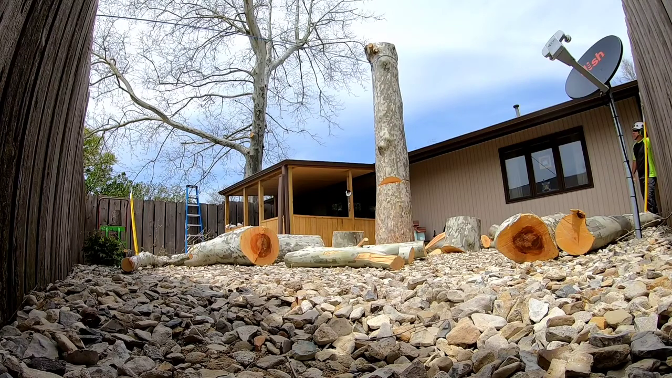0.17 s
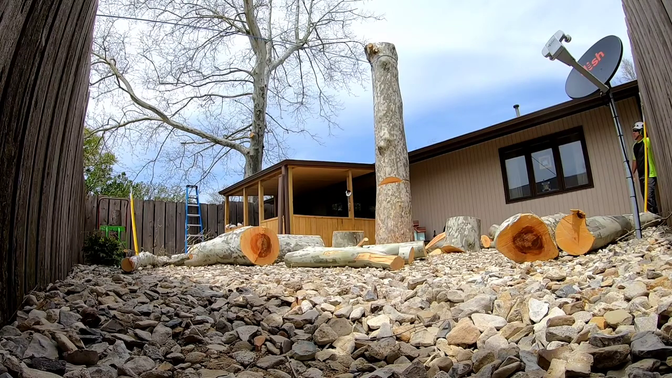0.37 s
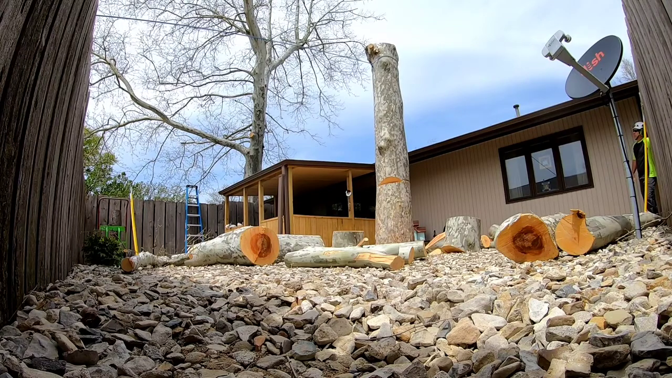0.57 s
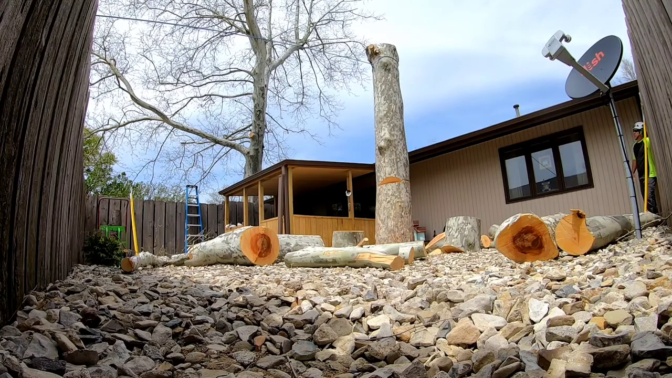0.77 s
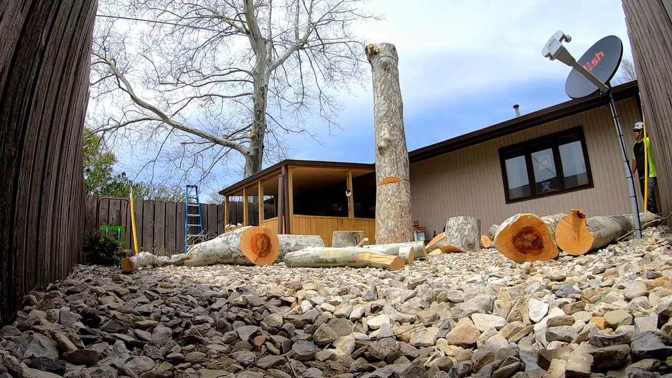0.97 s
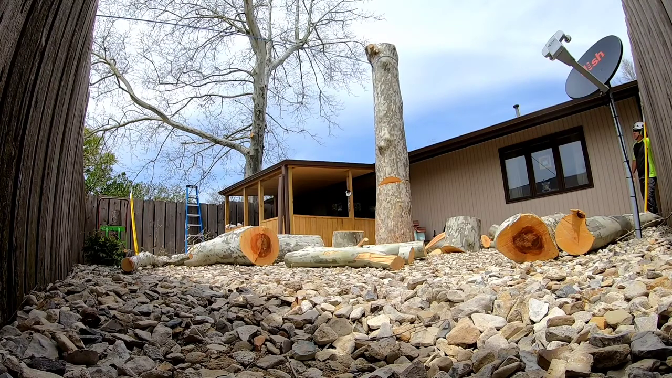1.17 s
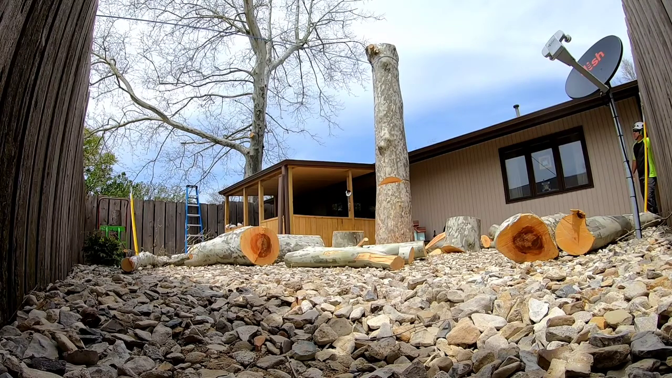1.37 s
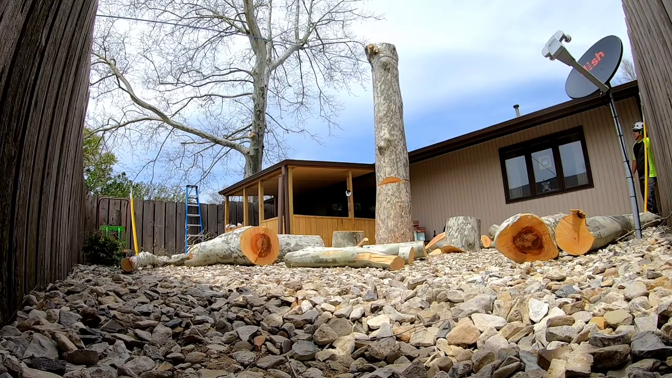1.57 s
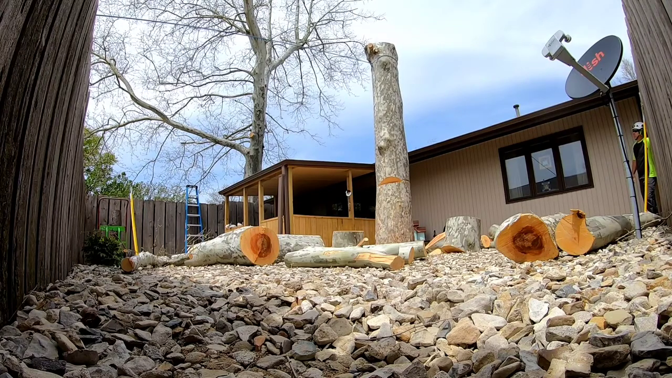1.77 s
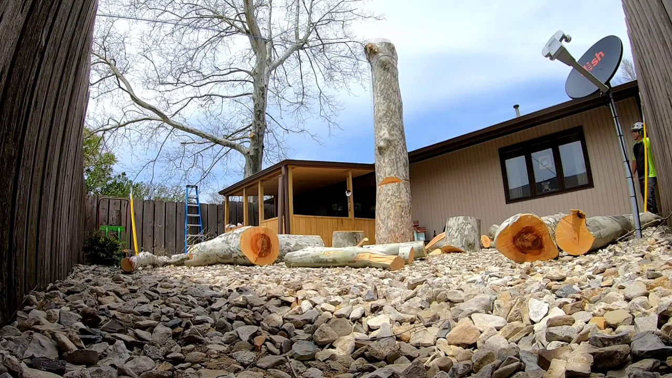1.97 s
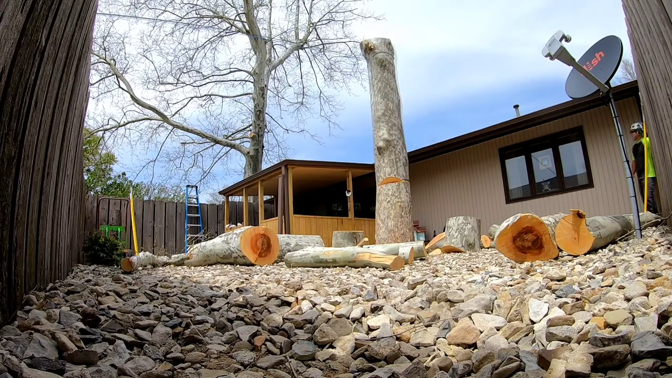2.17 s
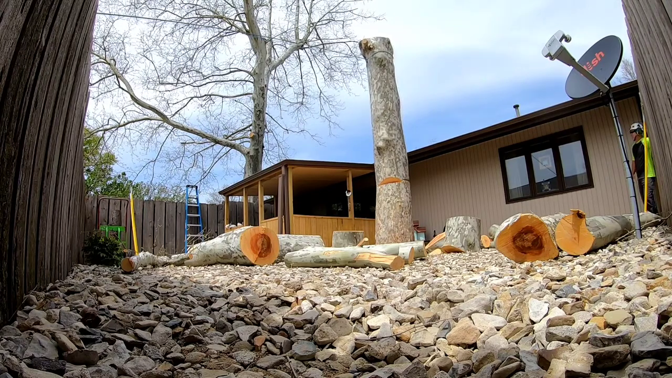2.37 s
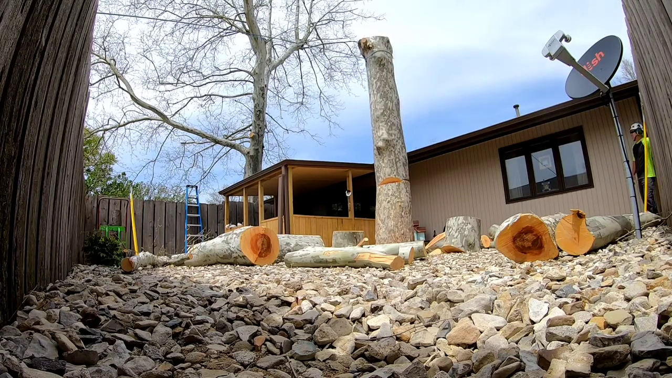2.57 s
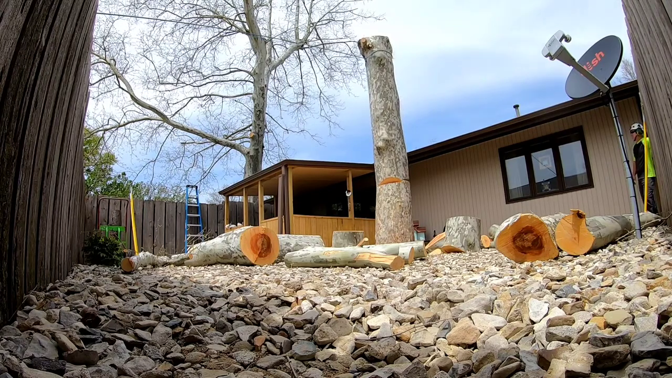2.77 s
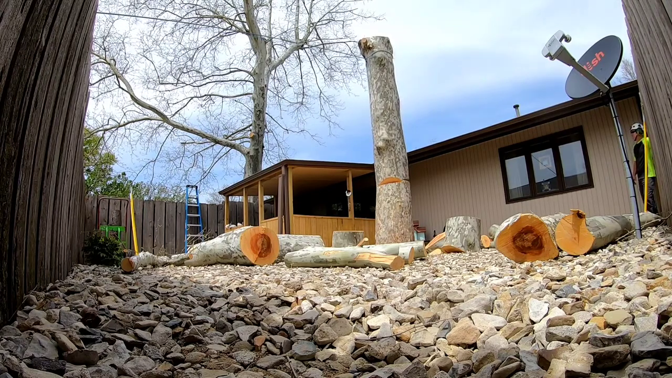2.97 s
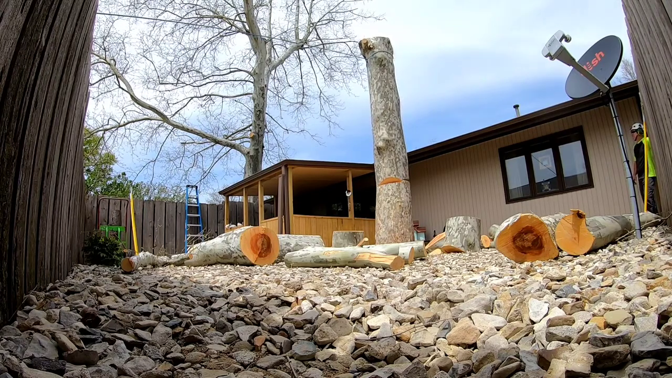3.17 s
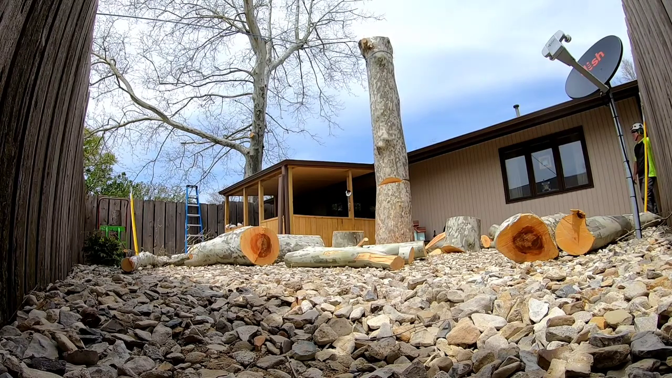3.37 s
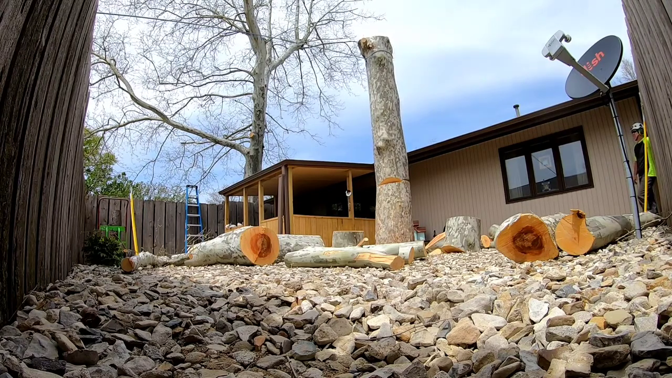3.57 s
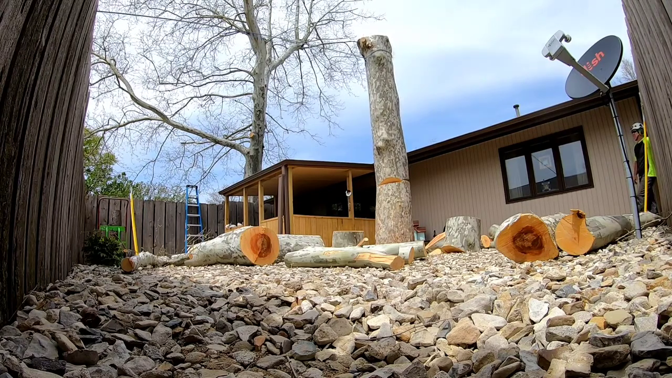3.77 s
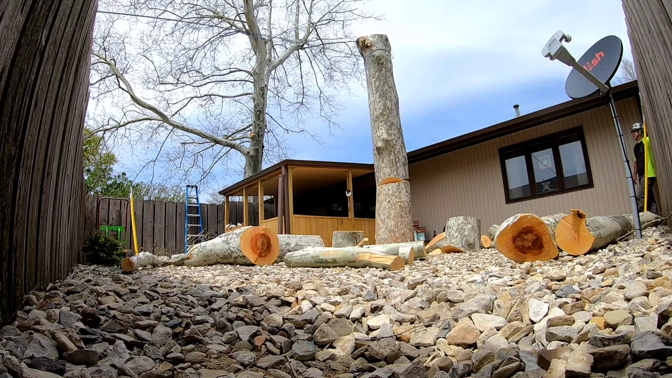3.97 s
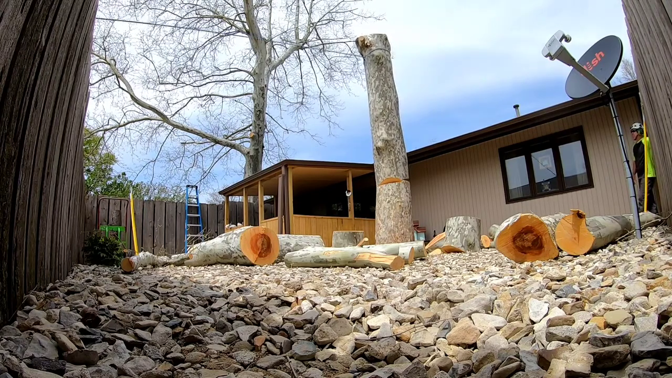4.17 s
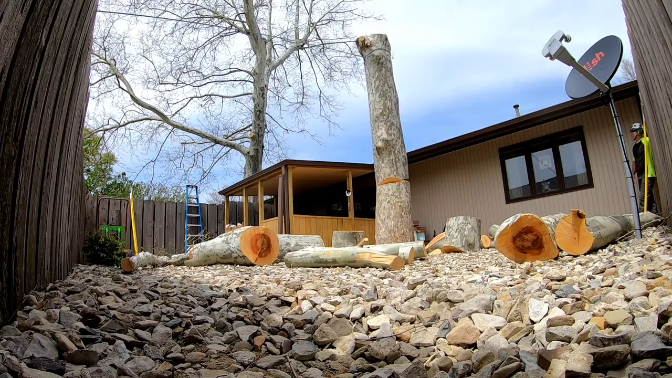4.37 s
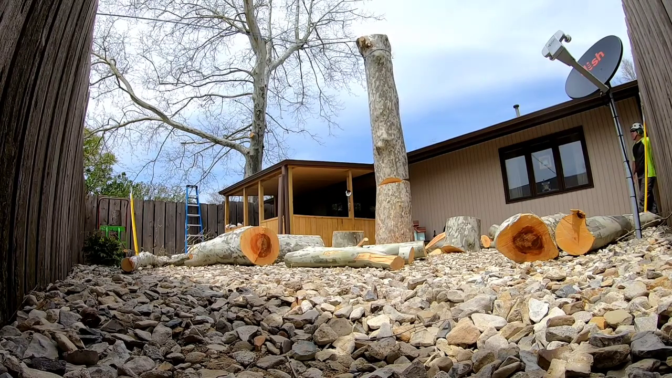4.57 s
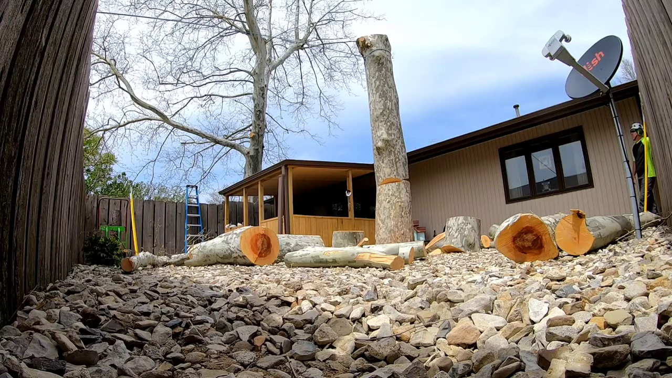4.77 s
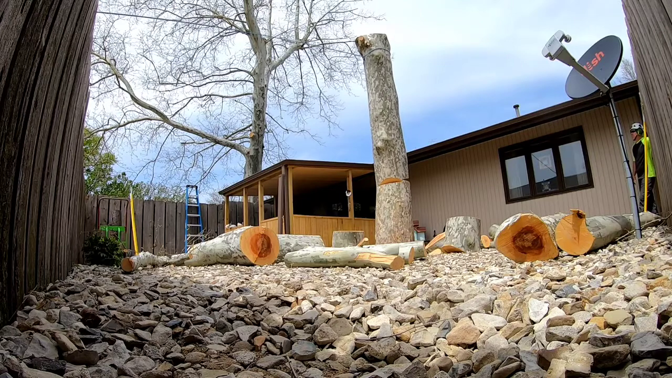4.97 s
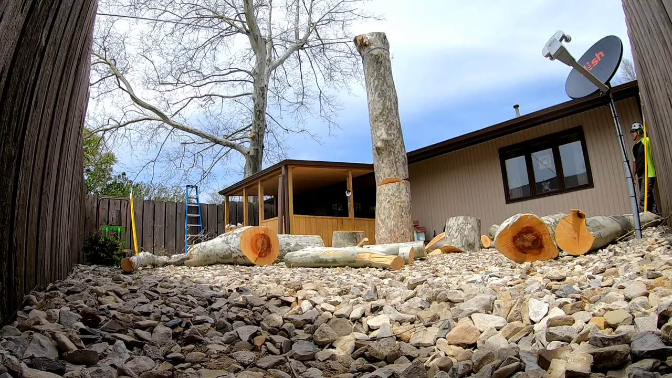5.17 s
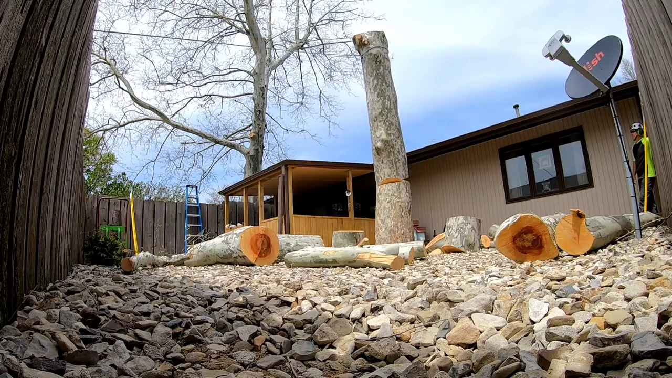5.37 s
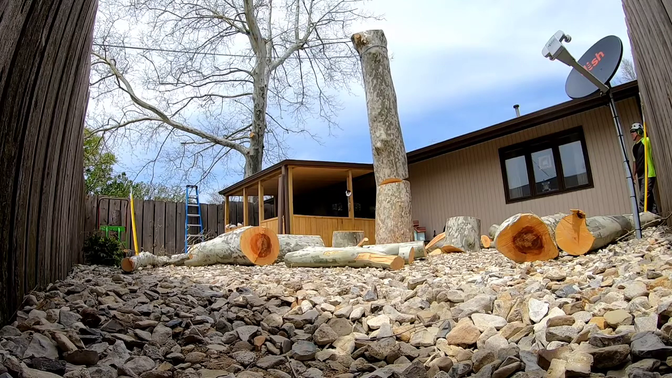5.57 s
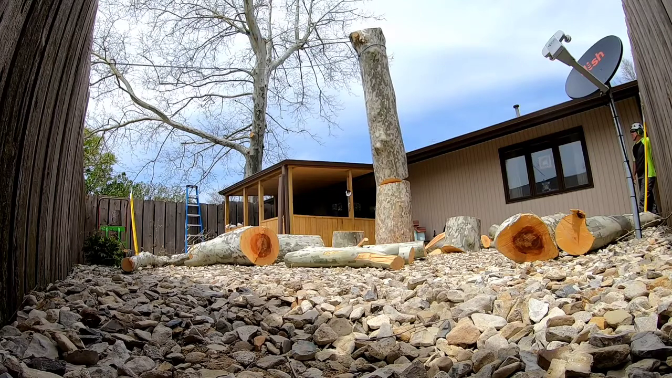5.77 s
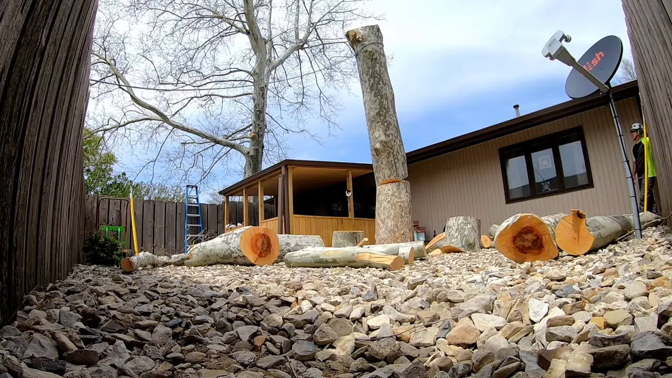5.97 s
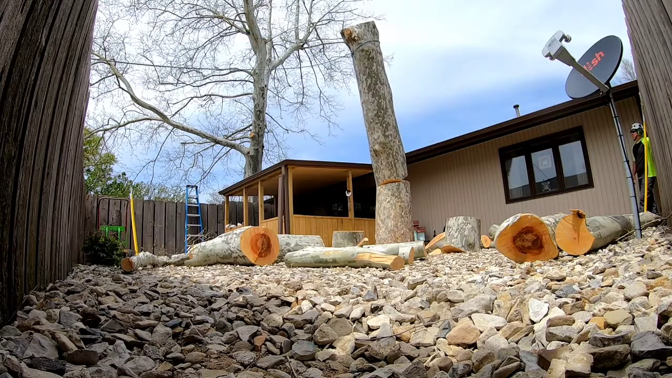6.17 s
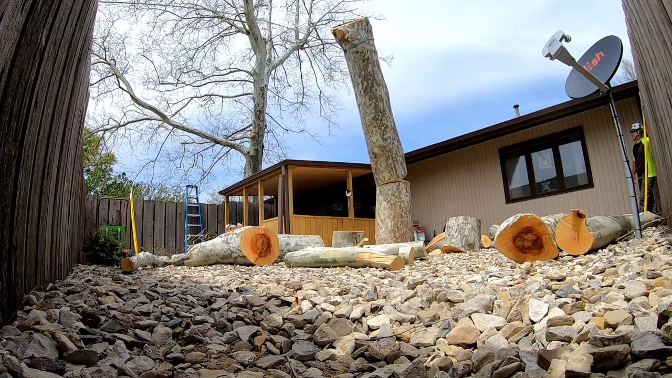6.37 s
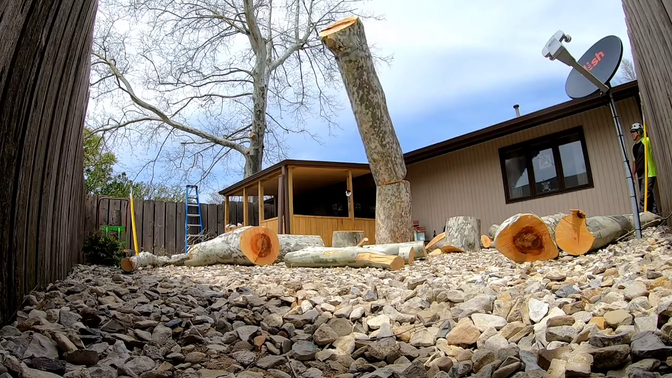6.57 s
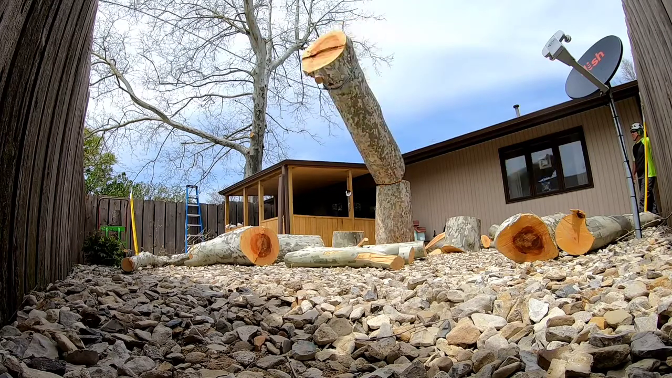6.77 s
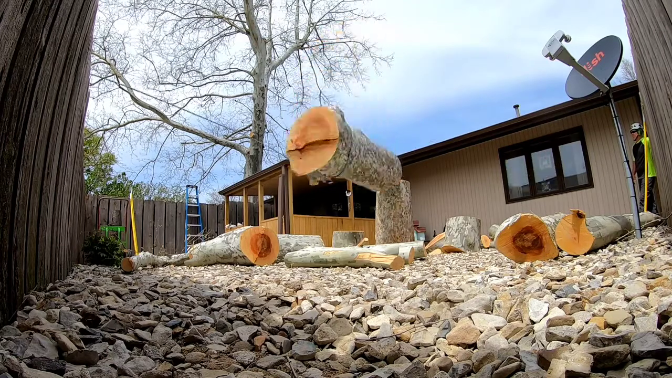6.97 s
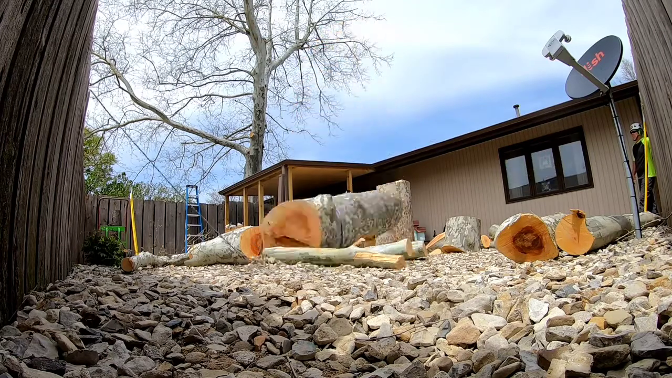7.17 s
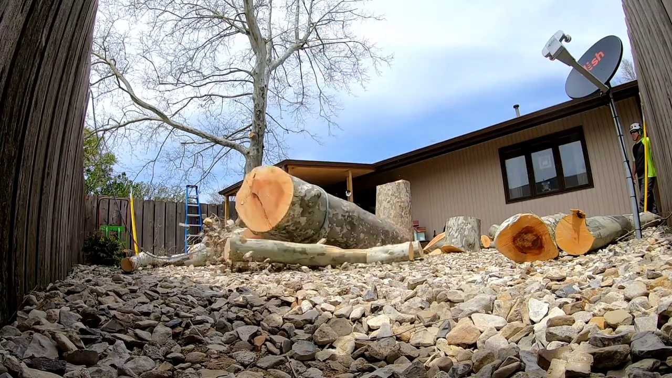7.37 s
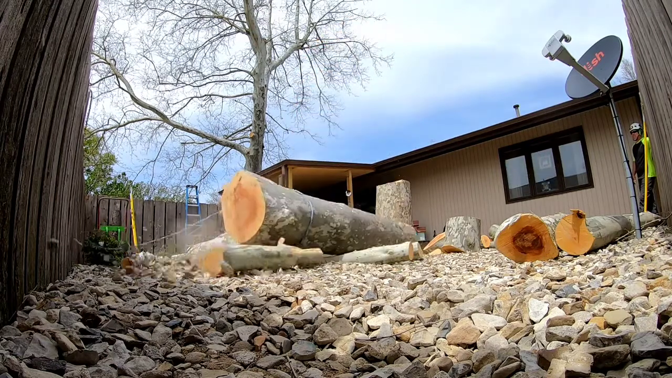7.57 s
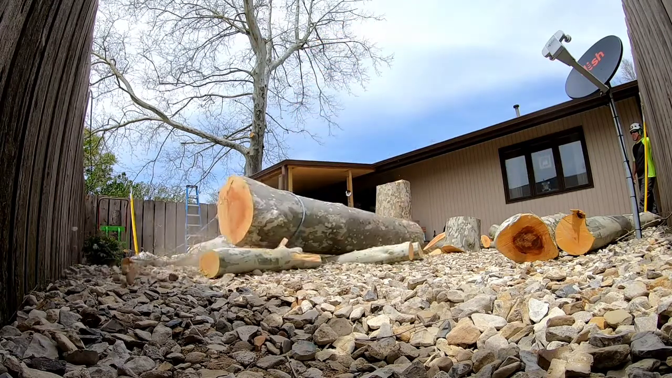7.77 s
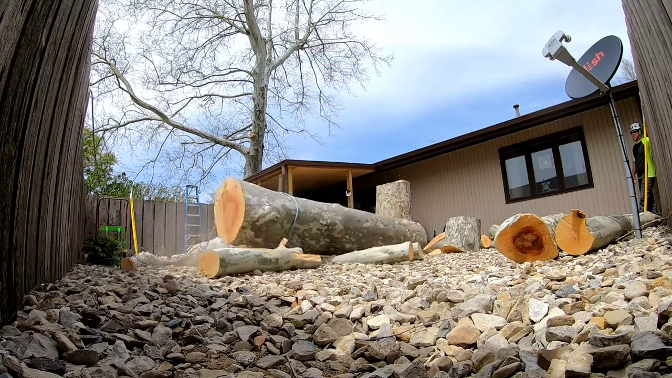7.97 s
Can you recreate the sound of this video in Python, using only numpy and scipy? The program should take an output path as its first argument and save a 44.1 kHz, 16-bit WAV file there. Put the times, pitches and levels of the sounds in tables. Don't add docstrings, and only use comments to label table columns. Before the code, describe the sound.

Stereo microphone at ground level in a small gravel yard. From 0 to about 2 s a car's low hum and faint fluttering tyre whine recede over soft town rumble; a distant bird rasps several times from 1.2 to 1.8 s. At 2.4-3.1 s wood fibres snap sharply over dense tearing. Quiet, then low ground rumble at 3.6 s and a second, thicker burst of cracks at 3.7-4.4 s. Rumble returns at 4.85 s, with a very faint high bird whistle near 5 s and sparser cracks from 5.05 to 6 s. Small creaks follow as the trunk tips; hard snaps and a woody boom mark the break around 6.7 s. At 7.2 s the trunk slams onto logs with a deep hollow thud, bouncing until 7.4 s. Gravel sprays and pings all around; logs knock at 7.7 s and roll to the 8 s end, with short reflections from fence and wall.

```python
import sys
import numpy as np
from scipy import signal
from scipy.fft import rfft, irfft, next_fast_len
from scipy.io import wavfile
from scipy.ndimage import uniform_filter1d

SR = 44100
rng = np.random.default_rng(int(sys.argv[2]) if len(sys.argv) > 2 else 0)


def volts_from_db(level):
    exponent = np.asarray(level, float) / 20
    return 10 ** exponent


def wav_record(signal):
    frames = np.transpose(np.atleast_2d(signal))
    bounded = np.clip(frames, -1, 1)
    quanta = np.round(bounded * 32767).astype(np.int16)
    wavfile.write(sys.argv[1], SR, quanta)


N = 353108
SIZE = next_fast_len(N + SR)
T = np.arange(N) / SR
HZ = np.maximum(np.fft.rfftfreq(SIZE, 1 / SR), 1)

# frequency in Hz, correlation.
LIKENESS = [(25, .66), (45, .75), (70, .94), (125, .995), (300, .985), (600, .75), (1000, .55), (1400, .5),
            (3000, .72), (6800, .2), (12000, .0)]
# time in seconds, level in dB.
CAR_LOSS = [
    (0.0, 0.5),
    (1.5, -5.5),
    (2.1, -14),
    (3.0, -48),
]


def over_hz(table):
    hz, value = np.transpose(table)
    return np.interp(np.log(HZ), np.log(hz), value)


def shape(x, gain):
    return irfft(rfft(x, SIZE) * gain, SIZE)[..., :N]


def causal(table):
    cepstrum = irfft(np.log(volts_from_db(over_hz(table))), SIZE)
    cepstrum[1:SIZE // 2] *= 2
    cepstrum[SIZE // 2 + 1:] = 0
    gain = np.exp(rfft(cepstrum))
    return gain / np.sqrt(np.mean(np.abs(gain) ** 2))


def band(lo_hz, hi_hz):
    return 1 / np.sqrt((1 + (lo_hz / HZ) ** 6) * (1 + (HZ / hi_hz) ** 6))


def unit(x):
    return x / np.sqrt(np.mean(x ** 2))


def along(s, db):
    return volts_from_db(np.interp(T, s, db, left=-200, right=-200))


def swell(table, rise_s):
    gain = 0
    for start_s, db, hold_s, fade_s in table:
        since_s = T - start_s
        rise = np.clip(since_s / rise_s, 0, 1) ** 2
        gain = gain + volts_from_db(db) * rise * np.exp(-np.maximum(since_s - rise_s - hold_s, 0) / fade_s)
    return gain


def add(x, s, rows):
    first = (np.asarray(s)[:, None] * SR).astype(int)
    np.add.at(x, np.minimum(first + np.arange(rows.shape[1]), N - 1), rows)
    return x


def wide():
    like = np.clip(over_hz(LIKENESS), 0, 1)
    mid, side = rng.standard_normal((2, N))
    mid = shape(mid, np.sqrt((1 + like) / 2))
    side = shape(side, np.sqrt((1 - like) / 2))
    return np.array([mid + side, mid - side])


def walk(rate_hz):
    k = int(SR / rate_hz)
    steps = np.repeat(rng.standard_normal(N // k + 1), k)
    return uniform_filter1d(uniform_filter1d(steps, k), k)[:N]


def grains(per_s, spread_db):
    hit = rng.random(N) < per_s / SR
    size = volts_from_db(spread_db * np.minimum(rng.exponential(size=N), 4))
    return unit(hit * rng.standard_normal(N) * size)


def modes(s, rows, centre_hz, table, reach_octaves):
    out = 0
    for hz, db, t60_s in table:
        pole = np.exp(2j * np.pi * hz / SR - np.log(1000) / (t60_s * SR))
        share = 1 / (1 + (np.log2(hz / centre_hz) / reach_octaves) ** 2)
        hits = add(np.zeros(N), s, rows * share[:, None])
        out = out + volts_from_db(db) * signal.lfilter([1], [1, -pole], hits).imag
    return out


def glide(table):
    s, hz, db = np.transpose(table)
    return np.sqrt(2) * along(s, db) * np.sin(2 * np.pi * np.cumsum(np.interp(T, s, hz)) / SR)


def echoed(rows):
    gap, strength = rng.random((len(rows), 2)).T
    lag = ((.00078 + .0001 * gap) * SR).astype(int)[:, None]
    at = np.arange(rows.shape[1])
    once, twice = (np.take_along_axis(rows, np.maximum(at - k * lag, 0), axis=1) * (at >= k * lag)
                   for k in (1, 2))
    return (rows + (.4 + .55 * strength)[:, None] * (once + .75 * twice)) / 1.3


def hinge():
    # time in seconds, peak in dB, lows in dB, highs in dB (both against peak).
    wood_snaps = [(2.4423, -21, -15, -20), (2.4592, -7.5, -20, -9.5), (2.4967, -24.5, -9.5, -6),
                  (2.5336, -14, -4, -12), (2.5457, -10.5, -18, -17.5), (2.5712, -6.5, -2, -19.5),
                  (2.5905, -13.5, -18, -12), (2.602, -9.5, -12, -14), (2.6138, -8.5, -13, -20),
                  (2.6356, -2, -30, -22.5), (2.6753, -14.5, -18, -17.5), (2.6932, -7, -23, -17),
                  (2.721, -19, -22, -6), (2.7503, -10, -10, -10), (2.7571, -11.5, -16, -11),
                  (2.78, -21, -18, -6), (2.8045, -26, -14, -9), (2.819, -11.5, -9, -11.5),
                  (2.845, -17, -16, -10), (2.8565, -12.5, -13, -15), (2.8998, -12.5, -23, -14.5),
                  (2.9414, -22.5, -22, -4), (2.9739, -11.5, -5.5, -14.5), (2.9854, -14.5, -16, -11.5),
                  (3.0274, -32.5, -22, -13), (3.0664, -36, -15, -8),
                  (3.7084, -14.5, -14, -14), (3.7623, -33, -10, -12.5), (3.7776, -27.5, -5, -19),
                   (3.8172, -23.5, -17, -11.5), (3.839, -13.5, -16, -17.5), (3.8863, -20.5, 0, -12),
                   (3.9012, -7.5, -5, -15), (3.9305, -14.5, -6, -15), (3.95, -11, -14.5, -15),
                   (3.966, -12, -5, -13), (3.992, -6, -17, -26.5), (4.003, -3, -25, -22),
                   (4.022, -2.5, -25, -27), (4.0448, -5, -16.5, -32), (4.0511, -6.5, -9.5, -37),
                   (4.061, -8, -13.5, -23), (4.165, -16.5, -7, -5), (4.1734, -21.5, -12, -9.5),
                   (4.217, -7, -11, -3), (4.23, -10, -25, -14), (4.2698, -12, -25, -20),
                   (4.2975, -18, -1, -15), (4.311, -18.5, -17, -4.5), (4.371, -29, -23, -16),
                   (4.3973, -43, -18, -16),
                  (5.052, -16, -31, -14), (5.106, -16.5, -16, -17), (5.1755, -9.5, -9, -8),
                  (5.191, -12.5, -31, -30), (5.2073, -25.5, -22, 3), (5.2305, -19.5, -26, -9),
                  (5.3082, -5.5, -13, -20), (5.3548, -17, -18, -11.5), (5.367, -19, -20, -14),
                  (5.4261, -9.5, -15.5, -17), (5.4453, -20.5, -27, -8), (5.4804, -20.5, -14, -9),
                  (5.5196, -21, -3, 0), (5.5652, -16.5, -1, -6.5), (5.572, -37.5, -19, -13),
                  (5.602, -34, -22, -6), (5.628, -30, -30, 7), (5.6916, -16.5, -20, -8),
                  (5.7546, -14, -12, -10), (5.802, -25, -2, -6), (5.813, -28, -13, -4),
                  (5.8763, -22, -14, -13), (5.9725, -37, -13, -6), (5.9916, -21.5, -3, -5.5),
                  (6.0753, -37, -21, 4), (6.1317, -35.5, -2, -8), (6.1443, -36, -4, -2), (6.24, -29, 0.5, -10),
               (6.3072, -35, 5, -15), (6.3675, -35, -10, -5), (6.449, -29, -21, -10),
               (6.4845, -9, -27, -16), (6.5825, -25, -11, -14), (6.6465, -29, -4, -11),
               (6.6895, -28, -15, -14), (6.7064, -9, -14, -14), (6.7345, -16, 2, -19),
               (6.7367, -3.5, -12, -20), (6.9694, -25, -31, -16), (7.073, -31, -30, -4.5),
                  (0.298, -51, -7, -13), (0.8754, -49, 16, -2), (0.926, -42, -8, -10),
             (2.2492, -37.5, -21.5, -11), (2.273, -42.5, -19.5, 1.5), (2.387, -40, -9, -26),
             (3.154, -42, -2, -3), (3.196, -36.5, -12, -11), (3.2375, -42.5, 4, -16), (3.3057, -37, -6, -8),
             (3.5496, -38, 0, -17), (4.522, -39.5, -4, -25), (4.572, -36, -7, -14), (4.799, -32.5, -11, -6),
             (7.2011, -6.5, -12, -6), (7.206, -9, -7, -9), (7.8135, -21.5, 9, 3)]
    # start in seconds, level in dB, hold in seconds, fade in seconds.
    tears = [(2.45, -33, 0.0067, 0.016), (2.545, -35.5, 0.25, 0.062), (3.71, -65, 0.074, 0.045),
             (3.89, -32, 0.13, 0.046), (4.1, -33, 0.015, 0.03), (4.162, -25.5, 0.0032, 0.026),
             (4.26, -45, 0.029, 0.02), (5.05, -55, 0.11, 0.11), (5.18, -41.5, 0.017, 0.085),
             (5.31, -37.5, 0.0093, 0.032), (5.4, -51.5, 1.153, 0.021), (6.69, -36, 0.022, .01),
             (6.715, -39, 0.076, 0.015), (6.96, -57, 0.52, .05)]
    # frequency in Hz, level in dB per Hz.
    fibre_colour = [(290, -44), (500, -14), (748, -19.5), (889, -8), (1170, -16), (1330, -3), (1600, -4),
                    (2260, -4), (3190, -4), (4840, -1.5), (7670, -11.5), (9250, -7), (11500, -22.5),
                    (14700, -28.5), (15500, -44)]

    s, db, low_db, high_db = np.transpose(wood_snaps)
    t = np.arange(256) / SR
    burst = rng.standard_normal((len(s), 256)) * (.3 * np.exp(-t / .0008) + .12 * np.exp(-t / .0025))
    burst[:, 0] = .5
    versions = echoed(burst), burst
    parts = ((low_db + 8, band(300, 2500)), (0 * db + 3, band(2500, 6500)), (high_db + 14, band(6500, 17000)))
    snaps = 0
    for part_db, gain in parts:
        level = volts_from_db(db + part_db)[:, None]
        snaps = snaps + shape(np.array([add(np.zeros(N), s, rows * level) for rows in versions]), gain)

    tearing = sum(shape(grains(900, spread_db=3.2), band(hz, 1.7 * hz)) for hz in 500 * 1.6 ** np.arange(8))
    tearing = shape(tearing, 1 + .22 * np.exp(-2j * np.pi * HZ * .00083))
    return shape(snaps + swell(tears, rise_s=0.0065) * unit(tearing), causal(fibre_colour))


def boom():
    # start in seconds, level in dB, hold in seconds, fade in seconds.
    kicks = [
        (6.735, -15.5, 0.0089, 0.024),
        (6.79, -35, 0.19, 0.028),
        (7.2, -11, 0.02, 0.058),
        (7.285, -15.5, 0.026, 0.027),
        (7.365, -16, 0.026, .009),
        (7.46, -39.5, 0.026, 0.021),
    ]
    # time in seconds, frequency in Hz.
    pitch = [
        (7.0, 139.4),
        (7.23, 138.6),
        (7.335, 125),
        (7.39, 122.8),
    ]
    phase = 2 * np.pi * np.cumsum(np.interp(T, *np.transpose(pitch))) / SR
    return np.sqrt(2) * swell(kicks, rise_s=0.012) * np.sin(phase)


def trunk():
    # time in seconds, peak in dB, loudest trunk mode in Hz, hard knock in dB, knock centre in Hz.
    blows = [(3.991, -18, 291, -23, 2590), (6.734, -9.5, 151, -36, 2550), (6.747, -8.5, 146, -25.5, 1880),
             (7.2, -3, 233, -20.5, 1490), (7.244, -3.5, 247, -31, 960), (7.255, -5, 66, -31, 1200),
             (7.274, -9, 209, -32, 1220), (7.362, -14, 170, -28, 1320), (7.39, -35, 66, -32, 500),
             (7.399, -8.5, 161, -31, 1340), (7.414, -10.5, 201, -32, 1830), (7.554, -33, 158, -39.5, 1770),
             (7.604, -20, 165, -33.5, 1310), (7.722, -10, 384, -14.5, 820), (7.731, -4.5, 152, -15, 1570),
             (7.811, -25, 300, -20.5, 905), (7.826, -30, 300, -23.5, 1000), (7.834, -27, 260, -24, 1110),
             (7.84, -30, 300, -21.5, 2020), (7.8455, -22.5, 350, -15, 2000), (7.878, -23, 324, -24, 744),
             (7.905, -32, 300, -24.5, 930), (7.927, -27.5, 256, -21.5, 990),
             (7.936, -27.5, 253, -16.5, 956), (7.944, -15.5, 174, -20.5, 860)]
    # time in seconds, peak in dB, mode in Hz, knock in dB, knock centre in Hz.
    creaks = [
        (6.022, -39, 420, -36.5, 620),
        (6.091, -31, 396, -39, 580),
        (6.492, -35.5, 503, -41.5, 576),
        (6.745, -13.5, 398, -26, 600),
    ]
    # mode in Hz, level in dB, t60 in seconds.
    trunk_modes = [(66, -7, 0.19), (161, -5, 0.097), (184.7, -6.5, 0.19), (233, -2.5, 0.13),
                   (263.4, -5, 0.16), (291, 3, 0.099), (398, 0, 0.11), (488, -10, 0.24)]
    # mode in Hz, level in dB, t60 in seconds.
    log_modes = [(593, 0, 0.028), (710, -2.5, 0.02), (930, -0.5, 0.024), (1110, 3, 0.013),
                 (1420, 1.5, 0.012), (1524, 4, 0.0068), (1895, 4.5, 0.012), (2150, 0.5, 0.017),
                 (2720, -3, 0.033)]

    s, db, body_hz, knock_db, knock_hz = np.transpose(list(blows) + creaks)
    t = np.arange(512) / SR
    push = np.sin(np.pi * np.clip(t / 0.002, 0, 1)) / (0.0017 * SR)
    scrape = rng.standard_normal((len(s), len(t))) * np.exp(-t / 0.0055) * (1 - np.exp(-t / 0.00069))
    body = modes(s, push * volts_from_db(db)[:, None], body_hz, trunk_modes, reach_octaves=0.35)
    knock = modes(s, scrape * volts_from_db(knock_db - 19.5)[:, None], knock_hz, log_modes, reach_octaves=0.53)
    return shape(body, band(40, 17000)) + knock + boom()


def stones():
    # start in seconds, level in dB, hold in seconds, fade in seconds.
    fine_sprays = [
        (7.13, -44.5, 0.061, 0.022),
        (7.196, -23, 0.006, 0.19),
        (7.28, -25, 0.01, 0.092),
        (7.4, -35, 0.023, 0.026),
        (7.5, -28.5, 0.21, 0.042),
        (7.78, -30.5, 0.031, 0.016),
        (7.85, -33, 0.1, .1),
    ]
    # start in seconds, level in dB, hold in seconds, fade in seconds.
    big_sprays = [
        (7.15, -26.5, 0.12, 0.015),
        (7.37, -29, 0.038, 0.0083),
        (7.545, -35.5, 0.016, 0.065),
        (7.8, -34, 0.092, 0.038),
        (7.91, -26, 0.019, 0.034),
    ]
    # frequency in Hz, level in dB per Hz.
    gravel_colour = [(290, -51), (500, 2), (748, -8), (1330, -5), (1620, -12.5), (2890, -9), (3850, -8.5),
                     (5440, -2), (7560, -15), (9660, -11), (11500, -25.5), (14000, -28), (15500, -60)]
    # time in seconds, frequency in Hz, level in dB.
    ringing = [(7.256, 5480, -14), (7.2848, 4940, -21), (7.3035, 5620, -16.5), (7.31, 3200, -14),
               (7.368, 1340, -16), (7.452, 4600, -15), (7.478, 5370, -10.5), (7.508, 4540, -21),
               (7.5472, 5160, -11), (7.569, 5520, -11), (7.605, 1310, -23), (7.608, 5100, -13.5),
               (7.634, 4920, -17), (7.667, 5540, -11), (7.70, 6380, -17.5), (7.717, 5600, -17),
               (7.7687, 5600, -20), (7.875, 5900, -27), (7.89, 3230, -18), (7.938, 3200, -20.5)]

    rock = 0
    for hz in 500 * 2 ** np.arange(0, 5.1, .2):
        ring = 1 / (1 + 1j * (HZ / hz - hz / HZ) * 4.5) ** 2
        mid, side = (shape(grains(0.14 * hz, spread_db=2.5), ring) / np.sqrt(hz) for _ in range(2))
        like = np.clip(np.interp(hz, *np.transpose(LIKENESS)), 0, 1)
        pair = np.sqrt(1 + like) * mid + np.sqrt(1 - like) * side * np.array([[1], [-1]])
        rock = rock + volts_from_db(2.5 * walk(40)) * pair
    rock = shape(rock, causal(gravel_colour))
    fine = swell(fine_sprays, rise_s=0.0053) * volts_from_db(-2.0) * unit(shape(rock, band(2500, 17000)))
    big = swell(big_sprays, rise_s=0.01) * volts_from_db(-6.5) * unit(shape(rock, band(400, 2500)))

    s, hz, db = np.transpose(ringing)
    t = np.arange(512) / SR
    tone = np.sin(2 * np.pi * hz[:, None] * t) * (1 - np.exp(-t / 0.00056)) * np.exp(-t / 0.0025)
    return fine + big + add(np.zeros(N), s, volts_from_db(db)[:, None] * tone)


def yard(x):
    # frequency in Hz, t60 in seconds.
    decay_times = [(150, 0.19), (600, 0.64), (2000, 0.2), (5000, 0.55), (10000, 0.37)]
    hz, t60_s = np.transpose(decay_times)
    t = T[:SR] - .0045
    noise = wide()
    tail = 0
    for lo_hz in 60 * 2. ** np.arange(8):
        band_t60_s = np.interp(np.log(lo_hz * np.sqrt(2)), np.log(hz), t60_s)
        decay = np.exp(-np.log(1000) * t / band_t60_s) * np.clip(t / .003, 0, 1)
        tail = tail + decay * shape(noise, band(lo_hz, 2 * lo_hz))[:, :4 * SR].reshape(2, 4, SR)
    tail = tail * (1 + 1.6 * np.exp(-np.maximum(t, 0) / 0.013))
    place = np.repeat(rng.integers(0, 4, N // 512 + 1), 512)[:N]
    share = uniform_filter1d(1. * (place == np.arange(4)[:, None]), size=128)
    return irfft(np.sum(rfft(x * share, SIZE) * rfft(tail, SIZE), axis=1), SIZE)[:, :N]


def birds():
    # centre in seconds, level in dB, half length in seconds.
    rasps = [
        (1.224, -48.5, 0.0083),
        (1.37, -57.5, 0.016),
        (1.53, -59, 0.018),
        (1.69, -57, 0.012),
        (1.841, -60, 0.013),
    ]
    # time in seconds, frequency in Hz, level in dB.
    whistle = [
        (4.915, 10700, -77),
        (4.955, 9160, -69),
        (5.0, 8840, -83.5),
        (5.05, 7950, -65),
    ]
    calls = sum(volts_from_db(db) * np.exp(-((T - s) / half_s) ** 2 / 2) for s, db, half_s in rasps)
    colour = band(4000, 5100) ** 5 + .4 * band(2600, 3600) ** 3 + .06 * band(8000, 10000) ** 3
    return calls * unit(shape(rng.standard_normal(N), colour)) + glide(whistle)


def heaves():
    # start in seconds, level in dB, rise in seconds, fade in seconds.
    shifts = [
        (3.555, -31, 0.046, 0.3),
        (4.85, -31, 0.017, 0.27),
        (5.0, -29, 0.03, 0.1),
        (7.134, -26, 0.0098, 0.08),
        (7.549, -28, 0.0064, 0.12),
    ]
    # frequency in Hz, level in dB per Hz.
    ground_colour = [(60, -17), (150, 5), (330, -2), (450, -22.5), (900, -20.5), (2800, -34.5), (4000, -46),
                     (16000, -66)]
    gain = 0
    for s, db, rise_s, fade_s in shifts:
        gain = gain + volts_from_db(db) * np.clip((T - s) / rise_s, 0, 1) * np.exp(-np.maximum(T - s, 0) / fade_s)
    return gain * volts_from_db(1.5 * walk(20)) * unit(shape(wide(), volts_from_db(over_hz(ground_colour))))


def engine():
    # time in seconds, frequency in Hz, level in dB.
    note_tables = [
        [(0.0, 106.4, -36), (0.136, 123.7, -41.5), (1.45, 108.2, -43)],
        [(0.0, 193.3, -39.5), (0.886, 217.3, -44.5), (1.25, 206.5, -45)],
    ]
    return sum(glide(note) for note in note_tables)


def tyres():
    tread_hz, level_db = 1000, -56.5
    whine = unit(shape(wide(), band(.92 * tread_hz, 1.1 * tread_hz) ** 3))
    return volts_from_db(level_db + 5 * walk(14)) * along(*np.transpose(CAR_LOSS)) * whine


def backdrop():
    # steady town in dB, leaving car in dB, strained ground in dB.
    feeds = [
        (-72, -71.5, -38.5),
        (-41, -35, -37.5),
        (-83, -45, -40),
        (-61.5, -47, -50),
    ]
    # start in seconds, level in dB, hold in seconds, fade in seconds.
    strain = [
        (2.54, -7, 0.19, 0.126),
        (3.867, -5, 0.433, 0.034),
        (4.99, -12, 1.6, 0.11),
        (7.193, 5, 0.17, 0.16),
        (7.806, 3, .3, .1),
    ]
    # time in seconds, level in dB.
    wind = [
        (0.0, -70),
        (1.5, -38),
        (3.0, -54),
        (4.9, -39.5),
        (6.5, -44),
        (8.01, -44),
    ]
    # frequency in Hz, level in dB per Hz.
    air_colour = [(12, -60.5), (20, -0.5), (43, -5), (71, -4), (112, -2), (200, -5), (278, -10.5),
                  (443, -17), (582, -26.5), (832, -30), (980, -24.5), (1520, -30.5), (2060, -31.5),
                  (3200, -42.5), (5360, -48), (8000, -66.5), (14000, -77.5)]

    car = along(*np.transpose(CAR_LOSS))
    deep = swell(strain[:-1], rise_s=0.029)
    full = swell(strain, rise_s=0.029)
    air = volts_from_db(over_hz(air_colour))
    edges_hz = (10, 60.0), (55, 236), (230, 810), (680, 17000)
    flicker_db = 2.5, 2.5, 2.2, 2.0
    gusts = along(*np.transpose(wind)), 0, 0, 0
    out = 0
    for (town_db, car_db, strain_db), load, gust, edges, flicker in zip(
            feeds, (deep, deep, full, full), gusts, edges_hz, flicker_db):
        level = np.sqrt(volts_from_db(town_db) ** 2 + (volts_from_db(car_db) * car) ** 2 + (volts_from_db(strain_db) * load) ** 2) + gust
        out = out + level * volts_from_db(flicker * walk(11)) * unit(shape(wide(), air * band(*edges)))
    return out


def port_lead(left, right):
    # frequency in Hz, left lead in radians.
    lead_rad = [(300, 0), (420, -.2), (600, -1.1), (1120, .5), (1720, .3), (2580, .3), (3100, -.7),
                (4820, .4), (6720, 1.3), (8440, 1.6), (15000, 1.5)]
    lead = np.exp(.5j * over_hz(lead_rad))
    return np.array([shape(left, lead), shape(right, 1 / lead)])


def port_shade(left, right):
    # frequency in Hz, left against right in dB.
    shade_db = [(40, 1), (100, .3), (380, 0), (700, 5.5), (1290, 2.7), (2380, .8), (4400, -6.5), (6000, -8),
                (8120, -5.5), (12000, 0)]
    shade = volts_from_db(over_hz(shade_db) / 2)
    return np.array([shape(left, shade), shape(right, 1 / shade)])


def scene():
    wood, wood_far = hinge()
    rocks, log, calls = stones(), trunk(), birds()
    echo = yard(volts_from_db(-41) * wood_far + volts_from_db(-44) * rocks[0] + volts_from_db(-45) * log + volts_from_db(-34) * calls)
    near = port_lead(*(wood + rocks + log + calls + echo))
    return port_shade(*(near + backdrop() + heaves() + tyres() + engine()))


def low_pass(x):
    return signal.sosfilt(signal.butter(12, 15670, fs=SR, output="sos"), x)


def record(dry):
    rounded = np.tanh(0.71 * dry) / 0.75
    lowpass = signal.ellip(8, .2, 60, 15500, fs=SR, output="sos")
    return low_pass(signal.sosfilt(lowpass, rounded))


dry = scene()
out = record(dry)
wav_record(out)
```